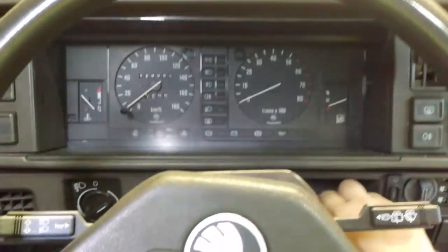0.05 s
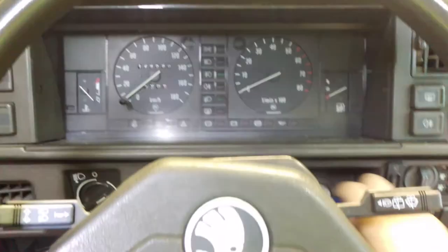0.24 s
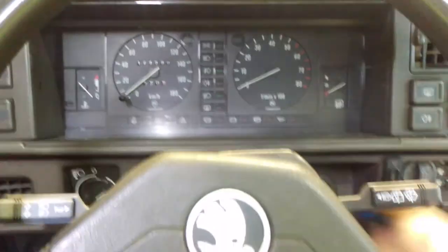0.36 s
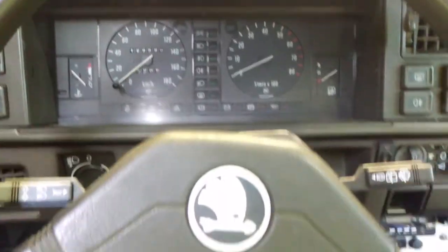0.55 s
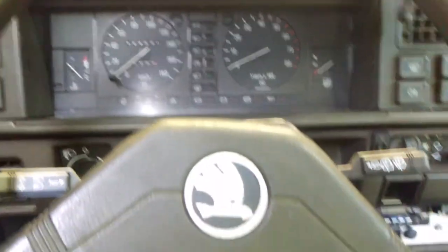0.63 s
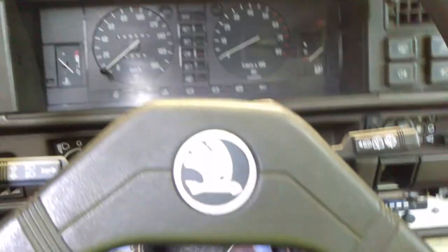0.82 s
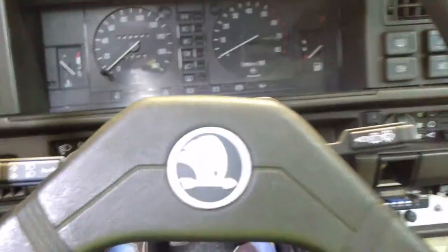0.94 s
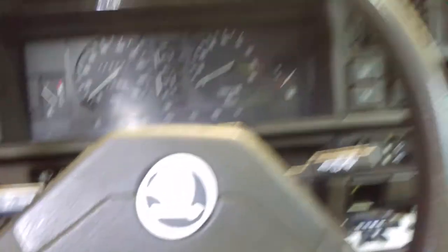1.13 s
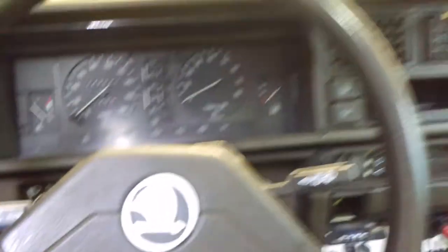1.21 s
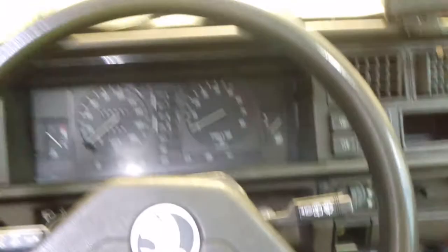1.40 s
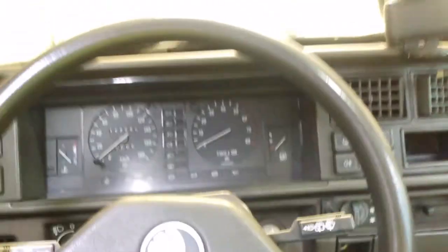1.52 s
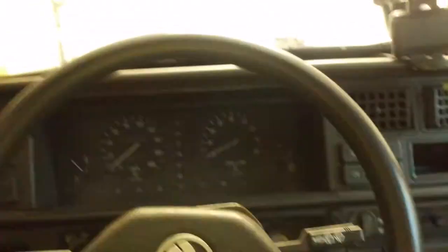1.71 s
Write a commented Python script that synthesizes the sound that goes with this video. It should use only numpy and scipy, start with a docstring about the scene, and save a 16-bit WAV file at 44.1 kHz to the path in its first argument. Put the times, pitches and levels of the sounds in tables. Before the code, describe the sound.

A key scrapes and ratchets in a car's steering lock, close up, with quick small clicks. At about 0.25 seconds the bolt snaps home with a loud metallic clunk that rings briefly in the cabin. Keys tinkle lightly around 0.7 to 0.8 seconds, and a dull knock comes near 1.7 seconds. Faint rumble, hiss and a few soft microphone bumps lie underneath.

```python
"""Key and steering lock in a parked car

Close up, on a hand-held microphone in the cabin: a hand works a control on the steering column,
probably drawing the key from its lock. It scrapes and ratchets over sprung pins, then a bolt snaps
home, ringing the column and booming in the cabin. Small metal parts tinkle and a dull knock follows,
over a faint rumble and hiss, a brief hum and the bumps of the microphone."""
import sys
import numpy as np
from scipy import signal
from scipy.fft import rfft, irfft
from scipy.io import wavfile
from scipy.ndimage import uniform_filter1d

SR = 44100
rng = np.random.default_rng(int(sys.argv[2]) if len(sys.argv) > 2 else 0)


def dump(signal):
    """Clip the signal to [-1, 1] and save it as 16-bit WAV at the path in sys.argv[1]."""
    limited = np.clip(np.atleast_2d(signal).T, -1, 1)
    pcm = np.round(limited * 32767).astype(np.int16)
    wavfile.write(sys.argv[1], SR, pcm)


N = 77175

# how alike the microphone's two sides are (frequency [Hz], correlation [0-1])
STEREO_LIKENESS = [(60, .97), (220, .95), (380, .8), (650, .2), (1300, .05), (2500, .2), (4500, 0)]
# room tone of the cabin (time [s], rumble [dB], hiss [dB])
ROOM_TONE_LEVELS = [(0, -68, -72.5), (0.22, -65.5, -73), (0.401, -56.5, -67), (.58, -64.5, -71.5),
                    (.72, -68.5, -68), (1.0, -66.5, -69), (1.25, -72, -72.5), (1.75, -78, -74)]
# level curves (time [s], level [dB])
HUM_LEVELS = [(.925, -77), (.952, -59.5), (1.03, -61), (1.135, -64.5), (1.17, -80)]
SLIDE_LEVELS = [(0, -56.5), (.03, -57), (.05, -64.5), (.066, -54), (.1, -56), (.125, -55), (.2, -61),
                (.228, -50), (.25, -80.5)]  # metal catching and slipping in the lock
# single events (time [s], level [dB])
MIC_BUMPS = [(0.296, -48), (0.377, -47), (0.414, -43.5), (0.621, -55.5), (1.016, -56), (1.701, -49.5)]
TRIM_KNOCKS = [(1.673, -59.5), (1.6789, -58), (1.6888, -41), (1.7273, -59.5), (1.745, -59)]
METAL_PINGS = [(.442, -68), (.7438, -52)]
# small metal parts touching (time [s], tinkle [dB], clink [dB], build-up [s])
METAL_TOUCHES = [(.442, -60, -69.5, 0.0023), (.471, -82, -62.5, 0.0027), (.704, -70, -61.5, 0.0031),
                 (.730, -60, -62.5, 0.0037), (0.7439, -47.5, -62, 0.00028), (.7585, -50, -65, 0.002),
                 (0.7924, -58.5, -62.5, .0004), (0.8146, -50.5, -47, 0.00019), (0.821, -61, -52.5, 0.00059)]
# sprung pins dropping (time [s], clack [dB], tick [dB], build-up [s])
PIN_DROPS = [(0.021, -39, -55.5, 0.0063), (0.0634, -48, -47.5, 0.0026), (0.0674, -33, -62, 0.00014),
             (0.0854, -39.5, -62, 0.00024), (0.107, -39.5, -43.5, 0.001), (0.138, -45, -75, .0004),
             (0.1506, -45.5, -45, .0014), (0.172, -47, -66.5, .0004), (0.183, -51.5, -47, 0.0012),
             (0.2055, -50, -45, 0.00037), (0.217, -44, -50, .001), (0.2294, -37, -55, .002)]
# the bolt's blow and rebounds (time [s], crack [dB], column [dB])
BOLT_BLOWS = [(0.2333, -13, -26), (0.2358, -20.5, -26.5), (0.2393, -22.5, -23), (0.2451, -22, -29),
              (0.2504, -24, -25), (0.2567, -29.5, -27)]

# spectra of lasting noises (frequency [Hz], relative band level [dB])
RUMBLE_BANDS = [(25, -5), (40, -3.5), (70, 1.5), (130, -3), (200, -2), (350, -8), (1500, -11.5)]
HISS_BANDS = [(300, -4.5), (600, 0), (1200, -2.5), (2500, 1.5), (5000, 1.5), (10000, 2.5), (16000, 0.5)]
SCRAPE_BANDS = [(100, -12), (140, 4), (220, -12.5), (330, -8), (480, -11.5), (900, -5), (1500, 1),
                (3000, -3.5), (5000, -10.5), (14000, -18)]
# dense ringing of each struck part (frequency [Hz], relative band level [dB], t60 [s])
MIC_BUMP_BANDS = [(45.4, -11.5, 0.13), (69.6, 18, 0.059), (120, -1, 0.11), (302, -24, 0.13)]
TRIM_BANDS = [(60.2, -14, 0.26), (252.7, -15, 0.2), (521, -0.5, 0.045), (707, -10, 0.051), (1031, 5, 0.054),
              (1780, -15.5, 0.078), (4000, -19.5, 0.089), (15140, -24.5, 0.044)]
TINKLE_BANDS = [(2003, -21, 0.029), (5166, -11, 0.051), (8070, 3, 0.023), (10840, -11, .04),
                (13930, 1, 0.032), (16000, -16, .03)]
CLINK_BANDS = [(1000, -28, 0.036), (2200, -3, 0.044), (5230, 2, 0.053), (10000, -11.5, 0.035),
               (15000, -22, 0.023)]
PIN_CLACK_BANDS = [(494, -21, 0.056), (927, -9.5, 0.037), (1770, 6, 0.028), (2390, -7, 0.035),
                   (3100, 0, 0.035), (4430, -10, 0.036), (15000, -25.5, .02)]
PIN_TICK_BANDS = [(1500, -14.5, .03), (4006, -9.5, .035), (7000, -2, 0.074), (9983, -3.5, .035),
                  (13000, 5.5, .035), (16080, -8, 0.037)]
BOLT_CRACK_BANDS = [(800, -11.5, .06), (1200, -6.5, .065), (1590, 0.5, .06), (2500, 2, 0.054),
                    (3160, 4, .048), (4000, -16, .05), (4960, 1.5, 0.03), (6460, -15.5, 0.049),
                    (9600, -14, .075), (15950, -35, .06)]
COLUMN_BANDS = [(53, -32, 0.1), (123, -4.5, 0.083), (200, -5, .15), (397, -8, 0.1), (610, 1.5, 0.09),
                (800, -6, .08), (1000, 1, .09), (1300, 2, 0.05), (3040, -20, 0.071)]
CABIN_BANDS = [(40, -20, .8), (70, -5, .7), (117, -5, .39), (180, 2.5, 0.8), (331, -5.5, .42),
               (650, 0.5, 0.46), (1200, -1, 0.33), (1995, -2, .4), (4012, -16.5, .34), (10000, -35, .5)]
# clear modes of each part (frequency [Hz], relative level [dB], t60 [s])
TRIM_MODES = [(547, -5, 0.053), (872, -12.5, 0.08)]
PING_MODES = [(10120, 0, .1), (10170, 1, 0.14), (12600, -10, 0.14)]
CLINK_MODES = [(4390, 0, 0.033)]
SPRING_MODES = [(9830, 0, .075), (10030, -1, .07), (12600, -11, .08)]
BOLT_MODES = [(1680.3, 1, 0.097), (1907, -2.5, 0.11), (2353, 0, .07), (2433, -0.5, 0.051),
              (2626, -1.5, 0.11), (2795, -4.5, .08), (3107, -4, .08), (3431, 0.5, 0.087), (3456, -3, .06)]
CABIN_MODES = [(65.6, -3.5, .8), (88.3, -1, .8), (129.3, -0.5, .62), (215, -2, .55), (1207, -11.5, 0.91)]
# steering column modes (frequency [Hz], relative level [dB], t60 [s], pan above the bass [dB])
COLUMN_MODES = [(267.3, -16, .37, -0.5), (355.3, -19, 0.25, -3), (479, -20, .27, -3), (554, -3, .16, -4.5),
                (670.6, -1, 0.13, 6), (727.3, 0, 0.1, 8), (912, -10.5, .14, 3), (1036, -15.5, .2, 8),
                (1210.5, -12.5, 0.16, 7), (1284, -9.5, 0.098, 1), (1415, -10.5, .085, -3.5)]

# pans are left minus right; below the crossover every source tends to the bass pan
BASS_PAN_DB, PAN_CROSSOVER_HZ = -1.3, 460
ROOM_PAN_DB, LOCK_PAN_DB, COLUMN_PAN_DB, METAL_PAN_DB = -3, 4, 3, 5.5
THIRD_OCTAVES_HZ = 25 * 2 ** (np.arange(29) / 3)
TIME_S = np.arange(N) / SR


def undb(db):
    """Decibels to gain."""
    return 10 ** (np.asarray(db) / 20)


def at(table, hz, column=1):
    """Read a table on a log-frequency axis."""
    table = np.array(table, float)
    return np.interp(np.log(hz), np.log(table[:, 0]), table[:, column])


def envelope(levels):
    """Gain along a level curve, silent outside it."""
    times, db = np.array(levels).T
    return undb(np.interp(TIME_S, times, db, left=-np.inf, right=-np.inf))


def wander(rate_hz):
    """Smooth random drift with a spread near 1."""
    hold = int(SR / rate_hz)
    steps = np.repeat(rng.standard_normal(N // hold + 1), hold)
    return np.sqrt(2) * uniform_filter1d(steps, hold)[:N]


def sides(pan_db, hz):
    """Left and right gains; the bass fills the cabin almost evenly."""
    share = 1 / (1 + (PAN_CROSSOVER_HZ / hz) ** 6)
    db = BASS_PAN_DB + (pan_db - BASS_PAN_DB) * share
    gains = undb(np.array([[db], [-db]]) / 2)
    return gains / np.sqrt(np.mean(gains ** 2))


def add(out, start_s, db, sound, lead=0):
    """Mix a sound in so that its sample number `lead` falls on start_s."""
    first = int(start_s * SR) - lead
    begin, end = max(first, 0), min(first + sound.shape[1], N)
    out[:, begin:end] += undb(db) * sound[:, begin - first:end - first]


def bands(table, size):
    """Third-octave stereo noises across a table's range: yields centre, gain and noise."""
    low_hz, high_hz = table[0][0] / np.sqrt(2), table[-1][0] * np.sqrt(2)
    centres = THIRD_OCTAVES_HZ[(THIRD_OCTAVES_HZ > low_hz) & (THIRD_OCTAVES_HZ < high_hz)]
    gains = undb(at(table, centres))
    bins_hz = np.maximum(np.fft.rfftfreq(size, 1 / SR), 1)
    alike = at(STEREO_LIKENESS, bins_hz)
    mid, side = rfft(rng.standard_normal((2, size))) * np.sqrt([1 + alike, 1 - alike])
    for hz, gain in zip(centres, gains / np.linalg.norm(gains)):
        window = np.cos(np.pi / 2 * np.clip(3 * np.log2(bins_hz / hz), -1, 1))
        noise = irfft(np.array([mid + side, mid - side]) * window, size)
        yield hz, gain, noise / (noise.std() + 1e-12)


def wash(table, pan_db, flicker_db):
    """Lasting noise whose bands flicker on their own."""
    return sum(gain * sides(pan_db, hz) * noise * undb(flicker_db * wander(42))
               for hz, gain, noise in bands(table, N))


def ring(modes, pan_db=0):
    """Decaying modes; the higher ones reach the microphone's two sides out of step."""
    out = 0
    total = np.linalg.norm([undb(mode[1]) for mode in modes])
    for (hz, db, t60, *own_pan_db), phase in zip(modes, rng.uniform(0, 2 * np.pi, len(modes))):
        apart = np.arccos(at(STEREO_LIKENESS, hz)) * np.array([[.5], [-.5]])
        env = np.exp(-np.log(1000) * TIME_S / t60) * (1 - np.exp(-TIME_S * hz))
        pan = own_pan_db[0] if own_pan_db else pan_db
        out += undb(db) * sides(pan, hz) * env * np.sin(2 * np.pi * hz * TIME_S + phase + apart)
    return out * np.sqrt(2) / total


def impact(table, pan_db, rise_s, size):
    """One blow on a part with many close modes; it lands a quarter of the way into the buffer."""
    t = (np.arange(size) - size // 4) / SR
    out = 0
    for hz, gain, noise in bands(table, size):
        build_up = np.minimum(t, 0) / max(rise_s, 1 / (2 * np.pi * hz))
        decay = np.log(1000) * np.maximum(t, 0) / at(table, hz, column=2)
        env = np.exp(build_up - decay)
        burst = noise * env
        burst *= np.linalg.norm(env) / np.linalg.norm(burst, axis=1, keepdims=True)
        out += gain * sides(pan_db, hz) * burst
    return out


def blows(events, table, pan_db, size=8192):
    """A series of blows on one part, each (time [s], level [dB], build-up [s])."""
    out = np.zeros((2, N))
    for start_s, db, rise_s in events:
        add(out, start_s, db, impact(table, pan_db, rise_s, size), lead=size // 4)
    return out


def room_tone():
    """Low cabin rumble and faint hiss around the microphone, swelling and then settling."""
    times, rumble_db, hiss_db = np.array(ROOM_TONE_LEVELS).T
    rumble = wash(RUMBLE_BANDS, ROOM_PAN_DB, flicker_db=1) * undb(np.interp(TIME_S, times, rumble_db))
    hiss = wash(HISS_BANDS, ROOM_PAN_DB, flicker_db=.36) * undb(np.interp(TIME_S, times, hiss_db))
    return rumble + hiss


def hum():
    """A brief, wavering low hum in the background."""
    centre_hz, waver = 115.8, .0503
    hz = centre_hz * (1 + waver * wander(30.05))
    return sides(BASS_PAN_DB, centre_hz) * envelope(HUM_LEVELS) * np.sin(2 * np.pi * np.cumsum(hz) / SR)


def mic_handling():
    """Soft low bumps from the hand holding the microphone."""
    return blows([(s, db, .005) for s, db in MIC_BUMPS], MIC_BUMP_BANDS, BASS_PAN_DB, size=16384)


def trim_knocks():
    """Dull knocks ring the hollow trim briefly, near the centre."""
    out = blows([(s, db, .0003) for s, db in TRIM_KNOCKS], TRIM_BANDS, pan_db=.5, size=16384)
    for s, db in TRIM_KNOCKS:
        add(out, s, db + 2, ring(TRIM_MODES))
    return out


def metal_tinkles():
    """Small metal parts, likely keys, touch close by; two tinkles and the hardest clink ring on."""
    tinkles = [(s, db, rise) for s, db, _, rise in METAL_TOUCHES]
    clinks = [(s, db, rise) for s, _, db, rise in METAL_TOUCHES]
    out = blows(tinkles, TINKLE_BANDS, METAL_PAN_DB) + blows(clinks, CLINK_BANDS, pan_db=.5)
    for s, db in METAL_PINGS:
        add(out, s, db, ring(PING_MODES, METAL_PAN_DB))
    hardest_s, hardest_db, _ = max(clinks, key=lambda clink: clink[1])
    add(out, hardest_s, hardest_db + 5, ring(CLINK_MODES))
    return out


def lock_ratchet():
    """Left of centre, metal scrapes and creaks; each pin rides up and drops with a clack and a tick."""
    creak_hz, waver, creak_db, roughness_db = 330, .06, -1.5, 3
    clacks = blows([(s, db, rise) for s, db, _, rise in PIN_DROPS], PIN_CLACK_BANDS, LOCK_PAN_DB)
    ticks = blows([(s, db, rise) for s, _, db, rise in PIN_DROPS], PIN_TICK_BANDS, LOCK_PAN_DB)
    scrape = wash(SCRAPE_BANDS, LOCK_PAN_DB, flicker_db=.5) * undb(roughness_db * wander(240))
    hz = creak_hz * (1 + waver * wander(65))
    creak = np.sin(2 * np.pi * np.cumsum(hz) / SR) * undb(creak_db + roughness_db * wander(50))
    return clacks + ticks + (scrape + creak) * envelope(SLIDE_LEVELS)


def bolt_snap():
    """Close up, the sprung bolt cracks against its stop and rebounds, ringing column and cabin."""
    out = blows([(s, db, 0) for s, db, _ in BOLT_BLOWS], BOLT_CRACK_BANDS, pan_db=.5)
    out += blows([(s, db, 0) for s, _, db in BOLT_BLOWS], COLUMN_BANDS, COLUMN_PAN_DB, size=16384)
    first_s = BOLT_BLOWS[0][0]
    heaviest_s = max(BOLT_BLOWS, key=lambda blow: blow[2])[0]
    add(out, heaviest_s, db=-12, sound=ring(COLUMN_MODES))
    add(out, heaviest_s, db=-38, sound=ring(CABIN_MODES))
    add(out, first_s, db=-16, sound=ring(BOLT_MODES, COLUMN_PAN_DB))
    add(out, first_s, db=-31, sound=ring(SPRING_MODES, METAL_PAN_DB))
    cabin_tail = blows([(heaviest_s, -37.5, 0)], CABIN_BANDS, pan_db=0, size=65536)
    return out + cabin_tail


def scene():
    """Everything the microphone hears from the driver's seat."""
    foreground = lock_ratchet() + bolt_snap() + metal_tinkles() + trim_knocks()
    return foreground + mic_handling() + hum() + room_tone()


def record(dry):
    """The recorder rounds the highest peaks and cuts the top above 16 kHz."""
    low_pass = signal.ellip(8, .2, 70, 16000, fs=SR, output="sos")
    return signal.sosfilt(low_pass, np.tanh(dry))


dry = scene()
out = record(dry)
dump(out)
```